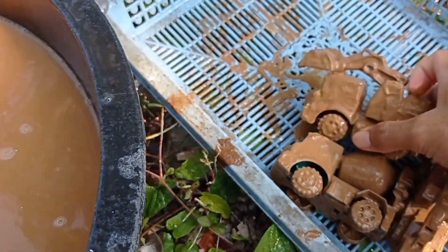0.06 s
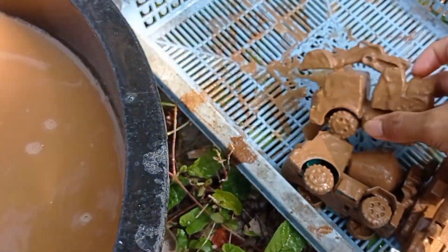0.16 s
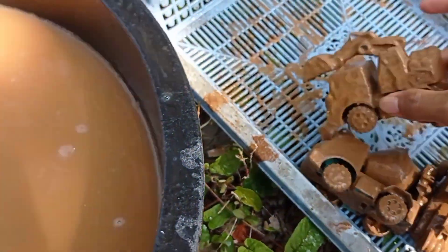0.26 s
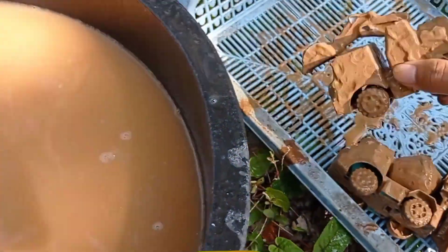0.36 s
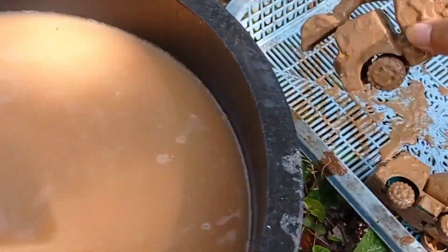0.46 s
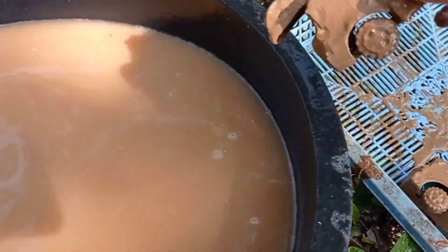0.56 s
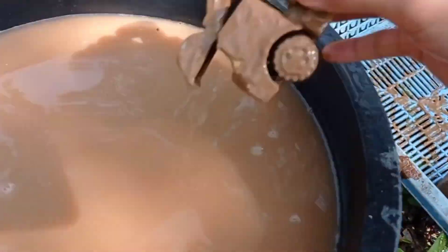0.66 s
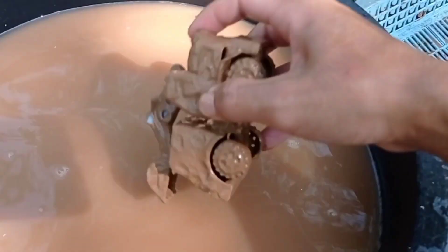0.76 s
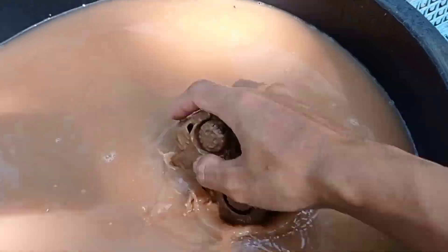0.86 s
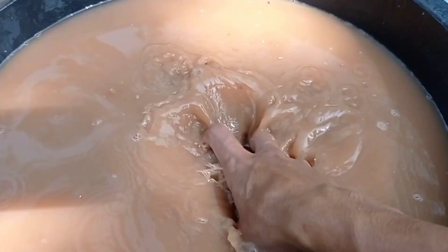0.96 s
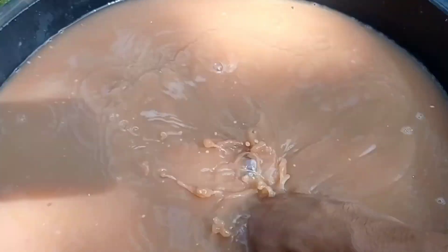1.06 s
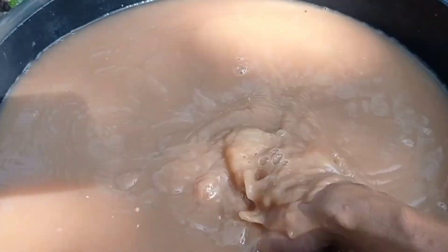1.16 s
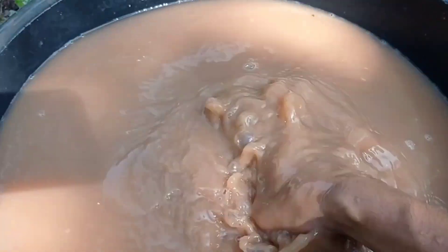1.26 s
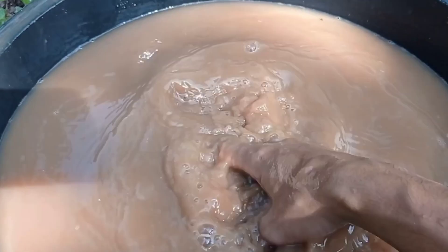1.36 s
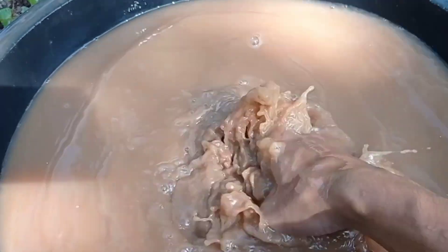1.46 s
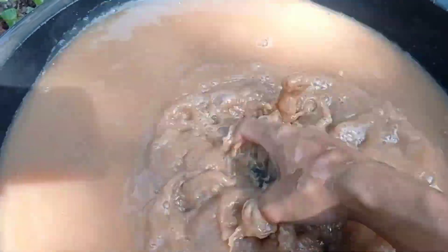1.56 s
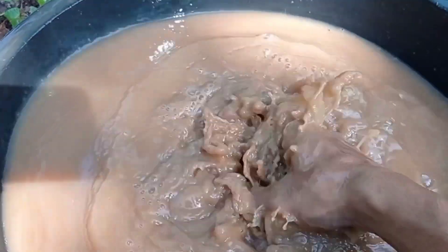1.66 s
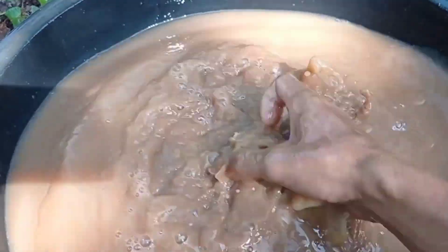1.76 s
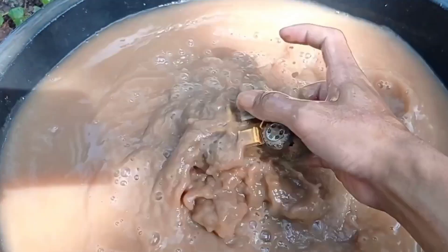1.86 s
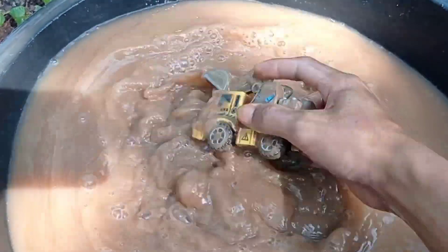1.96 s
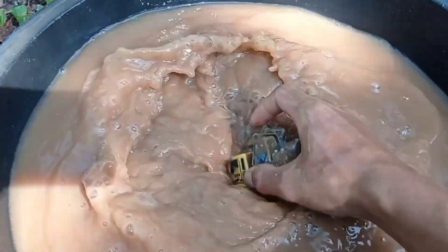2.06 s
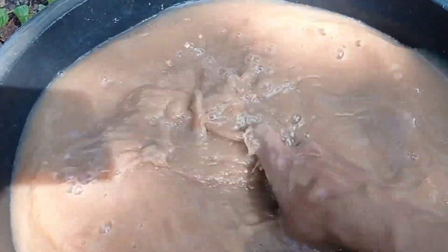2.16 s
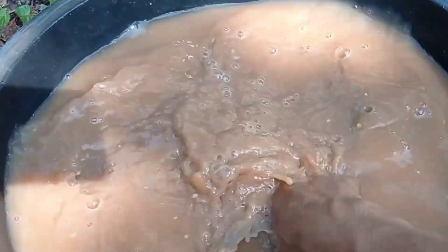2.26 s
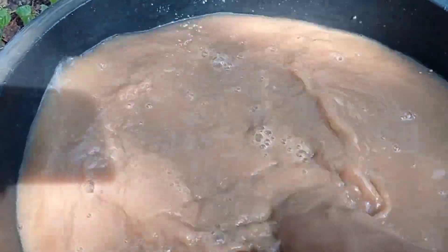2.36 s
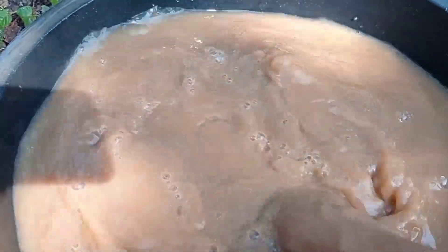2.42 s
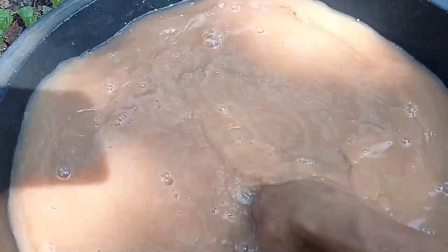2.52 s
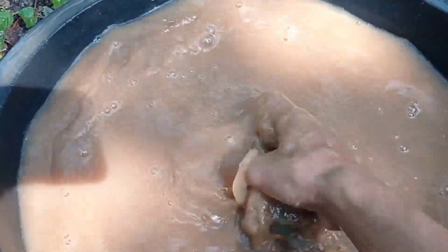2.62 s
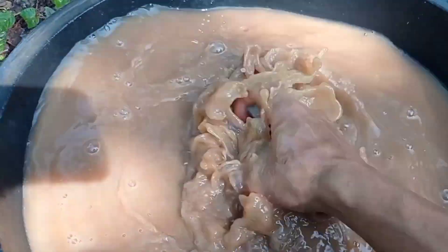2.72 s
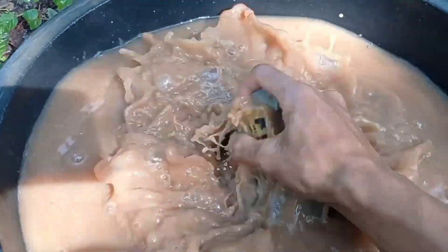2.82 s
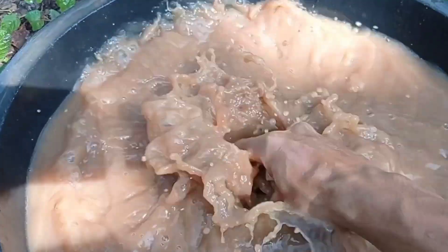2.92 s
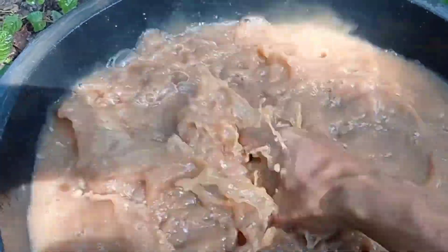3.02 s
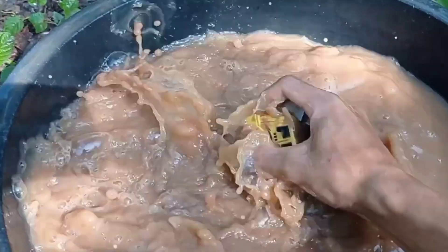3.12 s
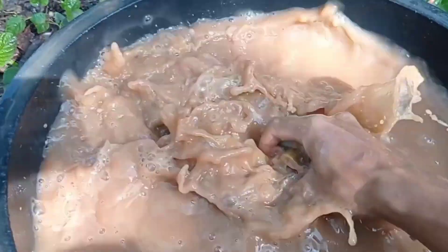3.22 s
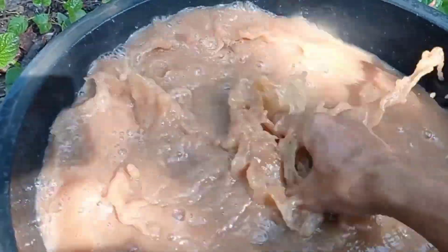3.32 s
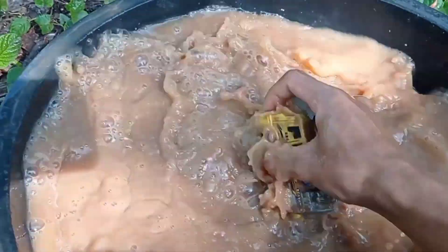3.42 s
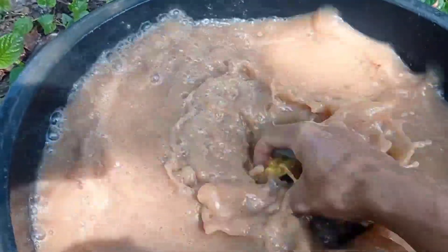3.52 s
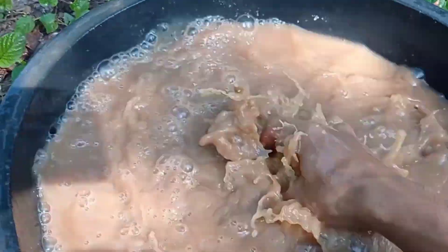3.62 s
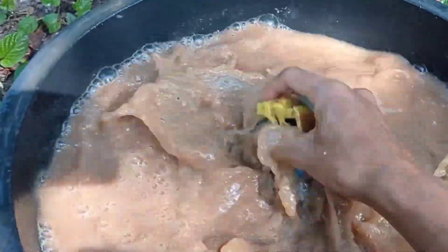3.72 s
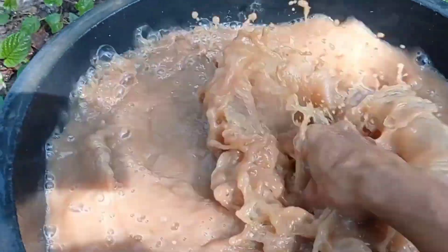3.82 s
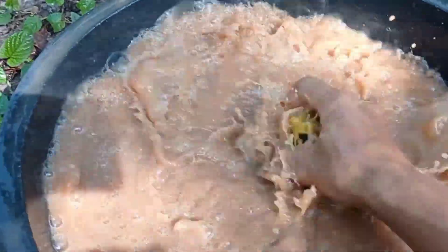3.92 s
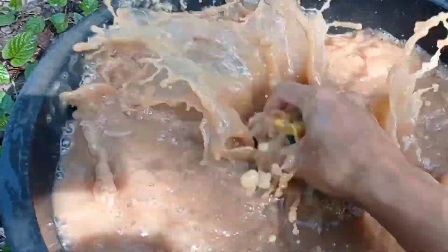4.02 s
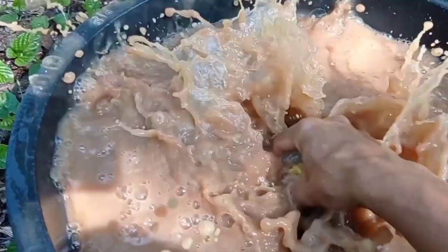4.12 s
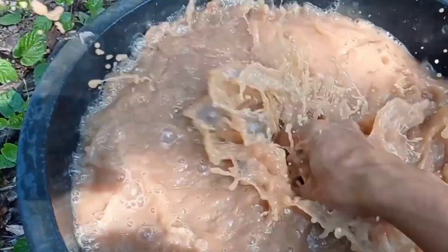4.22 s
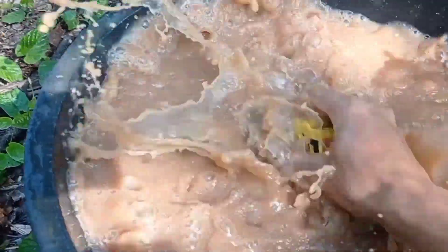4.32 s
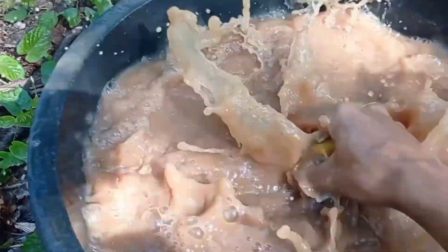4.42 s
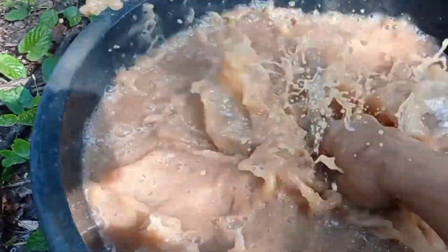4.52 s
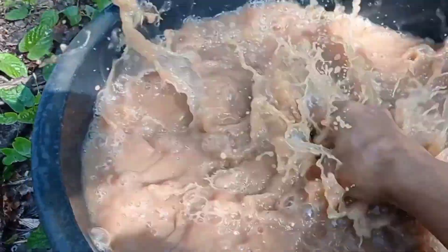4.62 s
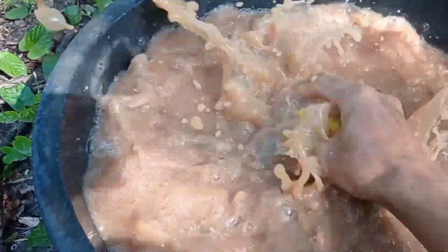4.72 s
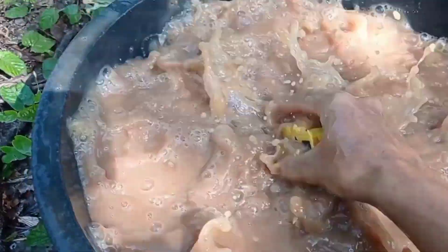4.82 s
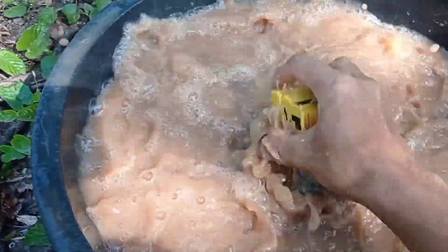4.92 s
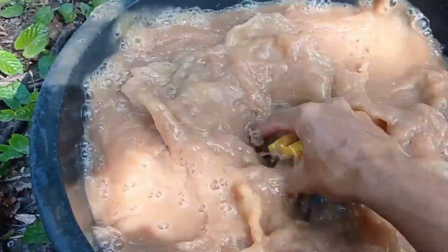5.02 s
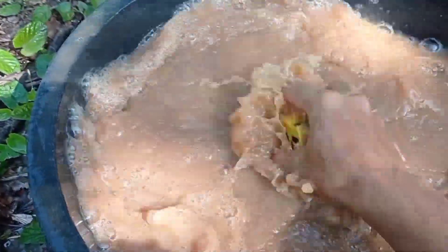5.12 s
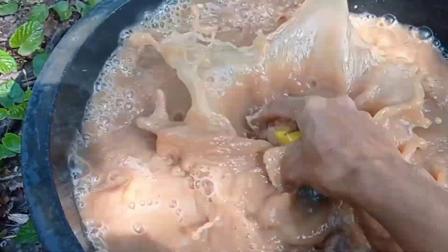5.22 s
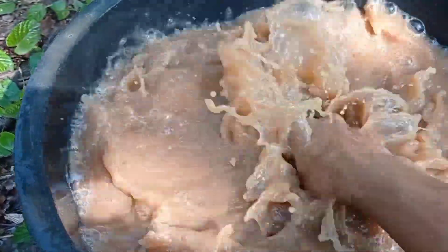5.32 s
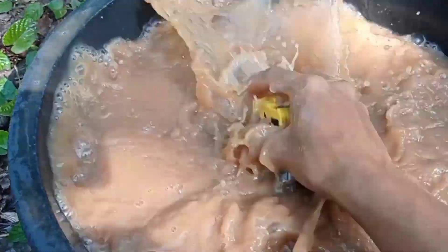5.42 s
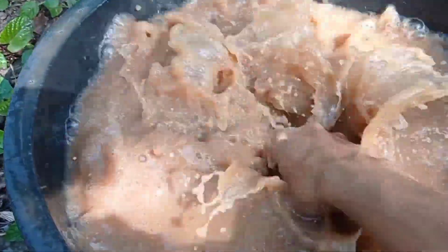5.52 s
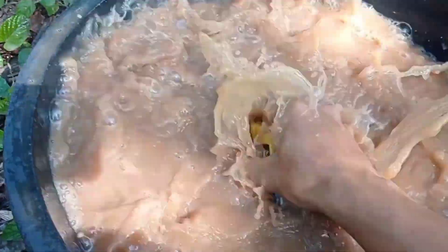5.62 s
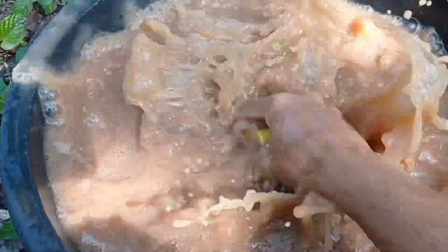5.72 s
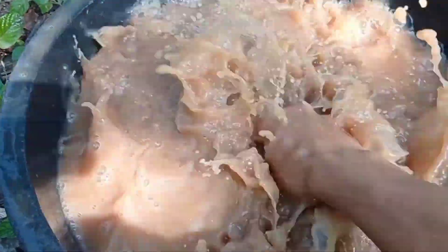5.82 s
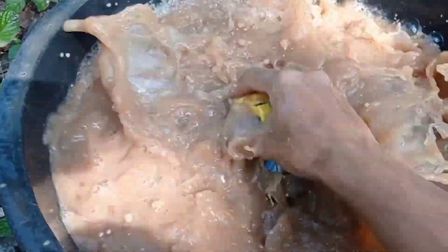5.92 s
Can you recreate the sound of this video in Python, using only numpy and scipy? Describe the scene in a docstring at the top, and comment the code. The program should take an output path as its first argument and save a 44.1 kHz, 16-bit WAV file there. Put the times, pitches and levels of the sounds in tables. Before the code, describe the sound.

The scene is a garden, with a close tub of muddy water over faint air, a thin steady insect shrill and a distant idling engine. From about 0.3 seconds a hand lifts a wet plastic toy, with drips, sharp little plastic ticks and plops. A dull bump of the tub and a brief high bird whistle come near 0.8 seconds. From 1 to 1.9 seconds the toy is dunked in a few separate splashes with bubbles and slaps. In a short lull around 2 seconds the small bird whistles faintly. From 2.3 seconds the toy is swished hard to and fro, six or seven strokes a second, a loud churning of spray, gulps, bubbles and slaps, while the engine fades. The strokes ease briefly near 4.5 seconds, then continue. Around 5.7 seconds the swishing stops, the last drops fall and the engine hum returns.

```python
"""Outdoors: a far engine idles under a steady insect shrill and faint garden air.
A hand lifts a wet plastic toy off a crate and dunks it in a tub of muddy water: drips, plastic ticks,
plopping air pockets, slaps and a dull bump, each briefly answered by the tub wall. A small bird whistles.
From 2.3 s the toy is swished hard to and fro; each stroke throws spray and folds in gulps and bubbles.
Near 5.7 s the swishing stops, the last drops fall and the engine, which had faded, comes back up."""
import sys
import numpy as np
from scipy import signal
from scipy.fft import rfft, irfft
from scipy.io import wavfile

SR = 44100
rng = np.random.default_rng(int(sys.argv[2]) if len(sys.argv) > 2 else 0)


def output_pcm(signal):
    """Save a mono or channel-first signal as 16-bit PCM at the path in sys.argv[1].

    Samples are clipped to [-1, 1] before scaling.
    """
    pcm = np.clip(np.atleast_2d(signal).T, -1, 1) * 32767
    wavfile.write(sys.argv[1], SR, np.round(pcm).astype(np.int16))


N = 263493
TIME = np.arange(N) / SR


def undb(db):
    """Decibels to gain."""
    return 10 ** (np.asarray(db) / 20)


def unit(x):
    """Scale to rms 1."""
    return x / np.sqrt(np.mean(x ** 2))


def curves(table):
    """The columns of a timed table as automation curves, one value a sample."""
    s, *columns = np.transpose(table)
    return [np.interp(TIME, s, c) for c in columns]


def clumps(rate_hz):
    """Random levels, smoothly joined; rms 1."""
    return unit(np.interp(TIME * rate_hz, np.arange(N), rng.standard_normal(N)))


def eq(x, points):
    """Filter by a curve of (freq_hz, gain_db) points."""
    hz, db = np.transpose(points)
    f = np.maximum(np.fft.rfftfreq(2 * N, 1 / SR), 1)
    return irfft(rfft(x, 2 * N) * undb(np.interp(np.log(f), np.log(hz), db)))[:N]


def bandpass(x, band_hz, order=3):
    """Keep what lies between two frequencies."""
    return signal.sosfilt(signal.butter(order, band_hz, "bandpass", fs=SR, output="sos"), x)


def resonate(x, hz, width_hz):
    """One steady resonance, gain 1 at its centre."""
    return signal.lfilter(*signal.iirpeak(hz, hz / width_hz, fs=SR), x)


def add(out, s, sound):
    """Mix a short sound in at time s."""
    i = int(np.clip(s * SR, 0, N))
    out[i:i + len(sound)] += sound[:N - i]


def ring(hz, swell_s, glide=0, phase=0, taper=2):
    """A tone swells and dies like a ringing air pocket, whose pitch slides as it changes shape."""
    age = np.arange(int(6 * swell_s * SR) + 2) / (swell_s * SR)
    pitch = hz * 2 ** (glide * np.tanh((age - 1.3) / 2))
    envelope = (age * np.exp(1 - age)) ** taper
    return envelope * np.sin(2 * np.pi * (np.cumsum(pitch) / SR + phase))


# idle speed: time_s, firings_per_s
ENGINE_SPEED = [(0, 32), (.35, 31.5), (1.05, 31.7), (2, 32.5), (3, 32.5), (5.97, 31.3)]
# engine fader: time_s, level_db
ENGINE_LEVEL = [(0, -52.5), (.7, -51), (2.3, -56), (3.6, -67.5), (5.78, -65), (5.88, -48.5), (5.97, -52)]
# boom of the exhaust: time_s, pitch_hz
EXHAUST_PITCH = [(0, 188), (1.4, 178.6), (2.3, 162.3), (3.2, 155), (5.6, 142.4), (5.97, 124)]


def engine(gain_db, swell_s, scatter_db, jitter_s, pitch_scatter):
    """Each firing gives one soft boom, and together they hum; distance has taken all the treble."""
    rate, db = curves(ENGINE_SPEED)[0], curves(ENGINE_LEVEL)[0]
    fired = np.floor(np.cumsum(rate) / SR)
    firings_s = np.flatnonzero(np.diff(fired, prepend=-1)) / SR
    out = np.zeros(N)
    for s, (late, strong, sharp) in zip(firings_s, rng.standard_normal((len(firings_s), 3))):
        hz = np.interp(s, *np.transpose(EXHAUST_PITCH)) * (1 + pitch_scatter * sharp)
        boom = undb(scatter_db * strong) * ring(hz, swell_s, taper=4.2)
        add(out, s - swell_s / 2 + jitter_s * late, boom)
    return unit(bandpass(out, [75, 300], order=2)) * undb(db + gain_db)


# far insect faders: time_s, shrill_db, chorus_db
INSECT_LEVELS = [(0, -52, -51), (.25, -51, -73), (.45, -53.5, -59), (1.9, -52.5, -64), (2.05, -52.5, -61),
                 (2.4, -54.5, -67), (5.97, -66.5, -60.5)]


def insects(shrill_hz, width_hz, chorus_hz, chorus_width_hz):
    """One narrow, wavering shrill and a broader chorus above it."""
    near, far = rng.standard_normal((2, N))
    shrill_db, chorus_db = curves(INSECT_LEVELS)
    shrill = resonate(resonate(near, shrill_hz, width_hz), shrill_hz, width_hz)
    chorus = resonate(resonate(far, chorus_hz, chorus_width_hz), chorus_hz, chorus_width_hz)
    return undb(shrill_db) * unit(shrill) + undb(chorus_db) * unit(chorus)


# tone of the garden air: freq_hz, gain_db
AIR_EQ = [(25, -5.5), (60, -6.5), (110, 9.5), (300, -4), (450, -17), (1100, -14.5), (3000, -20.5),
          (3600, -8.5), (4400, -22.5), (5200, -4), (5650, -17), (7000, -12), (10000, -26.5)]
# air fader: time_s, level_db
AIR_FADER = [(0, -52), (1.8, -61.5), (2.15, -55.5), (5.97, -66)]


def breeze(waver_db, waver_hz):
    """A faint bed of garden air; each band wavers on its own."""
    edges = np.geomspace(25, 12000, 20)
    noise = rng.standard_normal(N)
    air = sum(bandpass(noise, band) * undb(waver_db * clumps(waver_hz)) for band in zip(edges, edges[1:]))
    return undb(curves(AIR_FADER)[0]) * unit(eq(air, AIR_EQ))


def surge(s, rise_s, fall_s):
    """Power of one surge of water: it builds up to its peak at s and dies away."""
    out, t = np.zeros(N), TIME[:SR // 3] - 1 / 6
    add(out, s + t[0], np.exp(-(t / np.where(t < 0, rise_s, fall_s)) ** 2))
    return out


# lifting, dunking, letting go: peak_s, half_length_s, level_db, brightness_db
HAND_MOVES = [(.045, 0.0072, -69, -7), (0.284, 0.023, -60.5, -8), (0.358, 0.015, -50, -2),
              (0.425, 0.0083, -33.5, 1.5), (0.452, 0.0032, -28.5, 4), (0.471, 0.014, -34.5, 5),
              (0.525, 0.019, -40, 0.5), (0.592, 0.027, -38, 9.5), (0.651, 0.012, -38, -14),
              (0.699, 0.0027, -50, 14), (.7, 0.033, -55, -17.5), (0.758, 0.023, -47, -17),
              (0.873, 0.011, -36, -1), (0.97, 0.17, -49, -3.5), (1.059, 0.029, -43, 14),
              (1.073, 0.031, -37.5, -10), (1.193, 0.053, -35, 0), (1.247, 0.021, -29, -2),
              (1.285, 0.03, -35.5, 0.5), (1.375, 0.031, -47, -13), (1.449, 0.0055, -39.5, 4.5),
              (1.543, 0.083, -45, 5.5), (1.695, 0.017, -36, 1), (1.742, 0.008, -34, 1.5),
              (1.774, 0.01, -37, 8.5), (1.835, 0.013, -42, -16), (1.96, 0.1, -70.5, -28.5),
              (2.027, 0.032, -57.5, -27), (2.256, 0.021, -44, -0.5), (4.46, 0.048, -63, 4),
              (4.691, 0.006, -48, -15), (5.523, 0.0099, -32.5, -1.5), (5.73, 0.029, -38.5, 5),
              (5.847, 0.0092, -53, -15.5), (5.933, 0.015, -45.5, 7)]


def handling(gulp_db, spray_db):
    """Power of gulps, bubbles and spray in single moves of the toy; brightness trades gulps for spray."""
    power = np.zeros((3, N))
    for s, half_s, db, bright_db in HAND_MOVES:
        mix = undb([db + gulp_db - bright_db, db, db + spray_db + bright_db])
        power += mix[:, None] ** 2 * surge(s, half_s, half_s)
    return power


def swarm(low_hz, high_hz, cycles, spread_db, rise, count):
    """Many bubbles of scattered size and damping; most rise in pitch as they near the surface."""
    out = np.zeros(N)
    for k, (when, pitch, strength, damping, slide, phase) in enumerate(rng.random((count, 6))):
        hz = low_hz * (high_hz / low_hz) ** pitch
        life = 4 ** (2 * damping - 1)  # short lives are sharp ticks, long ones soft blips
        gain = undb(-spread_db * np.sqrt(strength)) * np.sqrt(hz / high_hz) * life ** -.3
        bubble = ring(hz, life * cycles / hz, rise * (2 * slide - .5), phase)
        add(out, (k + when) * N / SR / count, gain * bubble)
    return out


# tone of the gulps: freq_hz, gain_db
GULP_EQ = [(60, -32.5), (130, -24), (210, -4.5), (330, -7.5), (550, 6.5), (850, 6), (1200, 12), (2500, -28)]


def gulps():
    """Big pockets of folded-in air, low and quickly damped by the mud."""
    return eq(swarm(171, 1022, cycles=1.3, spread_db=15, rise=0.12, count=2200), GULP_EQ)


# tone of the bubbles: freq_hz, gain_db
BUBBLE_EQ = [(300, -33.5), (650, -29), (950, -3), (1700, 6.5), (2400, 5), (3200, 1.5), (4500, 7.5),
             (9000, -21.5)]


def bubbles(blip_db):
    """Mud damps most mid-sized bubbles within a few cycles; a few ring on as short blips."""
    damped = swarm(806, 3538, cycles=2.4, spread_db=15, rise=0.085, count=5000)
    blips = swarm(850, 3600, cycles=4.2, spread_db=13, rise=0.1, count=700)
    return eq(unit(damped) + undb(blip_db) * unit(blips), BUBBLE_EQ)


# tone of the spray: freq_hz, gain_db
SPRAY_EQ = [(1200, -32), (2500, -3), (3400, 4), (4500, 4.5), (6200, -0.5), (8300, 4.5), (9300, 1.5),
            (10300, -27)]


def spray(droplet_db):
    """A fine, bright mist with a few falling droplets standing out of it."""
    mist = swarm(2890, 10680, cycles=10.8, spread_db=5.5, rise=0.0067, count=14000)
    droplets = swarm(2700, 9500, cycles=7, spread_db=14, rise=0.04, count=550)
    return eq(unit(mist) + undb(droplet_db) * unit(droplets), SPRAY_EQ)


def tearing(steady_db, tears_per_s=150, decay_s=0.002, spread_db=2):
    """Sheets of water tear at random: a gain of short bursts over a steady part."""
    bursts = (rng.random(N) < tears_per_s / SR) * undb(spread_db * rng.standard_normal(N)) ** 2
    power = signal.lfilter([1], [1, -np.exp(-1 / (decay_s * SR))], bursts)
    return unit(np.sqrt(power / power.mean() + undb(steady_db) ** 2))


def water(gulp_db, bubble_db, spray_db, clump_db, fizz_db, plip_db):
    """Gulps, bubbles and spray, shed in clumps: gentle moves make them fizz, hard strokes churn."""
    layers = (gulps(), gulp_db), (bubbles(blip_db=-3), bubble_db), (spray(droplet_db=-4), spray_db)
    textures = np.array([undb(db) * unit(x * undb(clump_db * clumps(90))) for x, db in layers])
    hard = np.sqrt(swishing(wake_s=0.11))
    gentle = np.sqrt(handling(gulp_db=-11.5, spray_db=-6.5))
    churn = np.sum(hard * textures, axis=0) * tearing(steady_db=6.5)
    fizz = np.sum(gentle * textures, axis=0) * tearing(steady_db=-1.5)
    # a gentle move sheds few bubbles, so single plips stand out
    plips = gentle[1] * unit(swarm(1200, 4800, cycles=3, spread_db=12, rise=0.1, count=800))
    return churn + undb(fizz_db) * fizz + undb(plip_db) * plips


def tub(x, t60_s):
    """Short reflections between wall and moving water: never twice alike, so each band trails noise."""
    edges = np.geomspace(150, 12000, 14)
    keep = np.exp(-2 * np.log(1000) / (t60_s * SR))
    out = np.zeros(N)
    for band in zip(edges, edges[1:]):
        energy = signal.lfilter([1 - keep], [1, -keep], bandpass(x, band) ** 2)
        out += np.sqrt(energy) * unit(bandpass(rng.standard_normal(N), band))
    return out


# drips falling back on the water: start_s, pitch_hz, level_db
FALLING_DROPS = [(0.351, 2000, -27), (1.178, 2430, -17.5), (1.2822, 2780, -19), (1.319, 1590, -24.5),
                 (1.368, 1580, -26.5), (1.447, 1990, -36), (1.505, 1900, -45), (1.6522, 1620, -30.5),
                 (1.676, 3570, -31), (2.03, 970, -27), (2.26, 2600, -31), (2.512, 3660, -14),
                 (2.705, 3220, -17), (3.163, 3550, -16), (3.2974, 3820, -22), (3.311, 2130, -20),
                 (3.3285, 2000, -20), (3.3515, 2720, -20), (3.4844, 2175, -19), (3.504, 1580, -21),
                 (3.553, 2320, -16), (4.356, 1710, -18), (4.661, 2370, -22), (4.699, 1270, -23.5),
                 (4.8385, 1790, -21), (4.959, 1610, -14), (5.169, 4490, -17), (5.576, 1880, -19),
                 (5.652, 1230, -18.5), (5.679, 3350, -16), (5.747, 3130, -34), (5.776, 3270, -23),
                 (5.833, 4770, -22), (5.847, 2580, -30), (5.9177, 4000, -23)]


def drops(gain_db, decay_cycles, rise_oct_per_s, click_db, click_s):
    """A drop lands with a click and traps a tiny bubble that rings and rises in pitch."""
    out, age = np.zeros(N), TIME[:SR // 40]
    for s, hz, db in FALLING_DROPS:
        cycles = np.cumsum(hz * 2 ** (rise_oct_per_s * age)) / SR
        bubble = (1 - np.exp(-cycles)) * np.exp(-cycles / decay_cycles) * np.sin(2 * np.pi * cycles)
        click = undb(click_db) * rng.standard_normal(len(age)) * np.exp(-age / click_s)
        add(out, s, undb(db + gain_db) * (bubble + click))
    return out


# ticks of the plastic toy: start_s, level_db
TOY_TICKS = [(0.415, -29), (0.5535, -12), (0.643, -19), (1.593, -19.5), (1.78, -17), (1.833, -24),
             (1.886, -30.5), (5.887, -26.5)]
# tone of a tick: freq_hz, gain_db
TICK_EQ = [(300, -16), (1200, -26), (2600, 5), (4000, 7.5), (5800, 2.5), (7800, 2), (10000, -6)]


def ticks(gain_db, attack_s, decay_s):
    """Hard little impacts on plastic: a bright crack that is gone in a few milliseconds."""
    envelope, age = np.zeros(N), TIME[:SR // 40]
    shape = np.minimum(age / attack_s, np.exp((attack_s - age) / decay_s))
    for s, db in TOY_TICKS:
        add(envelope, s, undb(db + gain_db) * shape)
    return envelope * unit(eq(rng.standard_normal(N), TICK_EQ))


# the loudest single air pockets: start_s, pitch_hz, level_db, swell_s, glide_oct
AIR_POCKETS = [(0.4177, 1810, -16.5, 0.0044, -.43), (0.419, 593, -19, 0.0042, -0.012),
               (.451, 1600, -17, 0.0045, 0.28), (0.4725, 1250, 2.5, .0022, .2),
               (0.4997, 1150, -20.5, 0.0075, 0.44), (0.5654, 640, -18.5, 0.0017, -0.73),
               (0.587, 364, -5.5, 0.0023, -0.56), (.617, 965, -12, 0.0025, 0.2),
               (0.621, 343, -15, 0.0032, -0.096), (.756, 760, -16, 0.0038, -0.16),
               (0.7612, 366, -12, 0.0022, 0.79), (0.761, 1200, -22, 0.0088, -0.068),
               (0.7716, 536, -21, 0.0074, -.27), (0.7878, 1050, -5, 0.0023, -0.12),
               (.802, 1460, -27, 0.0096, -.18), (0.8883, 525, -7.5, 0.0033, 0.49),
               (1.0603, 1940, -19, .004, -.2), (1.147, 1095, -22.5, .005, 0.32),
               (1.244, 1110, -26, 0.0034, 0.41), (1.245, 633, -25, 0.0062, 0.021),
               (1.59, 1454, -19.5, 0.0066, .14), (1.6853, 2250, -17.5, .003, -0.0038),
               (1.825, 1000, -15, 0.0028, -0.83), (1.8286, 496, -18, 0.0036, 0.0092),
               (2.0518, 667, -22.5, 0.0074, -0.17), (2.2348, 1870, -24, .0026, -0.06),
               (2.2874, 1820, -21.5, 0.0062, 0.076), (2.372, 1056, -13, 0.0061, -0.36),
               (2.3772, 1720, -4.5, 0.0013, -0.72), (2.39, 1050, -10, .003, -0.11),
               (2.4597, 1590, -12, 0.0035, 0), (2.5268, 2130, -11.5, 0.0012, 0.053),
               (2.586, 1520, -15, 0.0042, -0.072), (2.7492, 2120, -7.5, 0.0039, .2),
               (2.8176, 1110, -5, 0.00094, 0.5), (2.816, 1745, -6, 0.005, 0.32),
               (2.825, 700, -14.5, .003, -0.24), (2.8494, 2550, -14, 0.0038, -0.03),
               (2.947, 766, -15, 0.0022, 0.17), (2.96, 578, -16.5, 0.0045, 0.087),
               (2.9723, 600, -12, 0.0037, -0.37), (3.123, 1600, -27, 0.0036, 0.11),
               (3.145, 670, -12.5, 0.0023, -0.18), (3.265, 1920, -9, 0.0014, 0.03),
               (3.2717, 1530, -10, 0.0034, -0.048), (3.272, 650, -28, 0.002, -0.09),
               (3.389, 1590, -15, 0.0034, 0.15), (3.4268, 2060, -9, 0.0027, 0.45),
               (3.4322, 620, -11, 0.0041, .37), (3.4622, 960, -5, 0.0011, -.35),
               (3.718, 738, -14.5, 0.0046, 0.7), (3.871, 1510, -14.5, 0.0019, 0),
               (3.92, 763, -18.5, 0.0034, 0.31), (3.9324, 800, -15, 0.0018, -0.14),
               (4.1965, 775, -14.5, 0.0025, 0.19), (4.279, 1850, -7, 0.0013, 0.31),
               (4.394, 422, -16.5, 0.0019, -0.017), (4.607, 1550, -15, 0.0039, -0.14),
               (4.792, 1240, -14.5, 0.0041, 0.045), (5.1271, 795, -15.5, 0.0033, 0.6),
               (5.1363, 1684, -14.5, 0.0069, -0.04), (5.2277, 2104, -10, 0.0033, 0.74),
               (5.2875, 890, -9.5, 0.0042, 0.14), (5.291, 922, -12, 0.0071, -0.14),
               (5.322, 2020, -18, 0.0023, -0.05), (5.3978, 1970, -5.5, 0.0024, 0.13)]


def plops(gain_db, mud_taper, thud_ratio, thud_db, thud_full_hz):
    """A pocket rings over a lower thud of the water it shoves aside; more taper stops it sooner."""
    out = np.zeros(N)
    for s, hz, db, swell_s, glide in AIR_POCKETS:
        pocket = ring(hz, swell_s, glide, rng.random(), mud_taper)
        thud = ring(hz * thud_ratio, swell_s, glide, rng.random(), mud_taper)
        thud_gain = undb(thud_db) * min(hz / thud_full_hz, 1)  # weaker under low-pitched pockets
        add(out, s, undb(db + gain_db) * (pocket + thud_gain * thud))
    return out


# water hitting hand, toy and wall: start_s, centre_hz, level_db, decay_s
WATER_SLAPS = [(0.5538, 2470, -16, 0.0025), (.589, 1000, -22, 0.0016), (.645, 3200, -18.5, 0.0024),
               (1.06, 3200, -22, 0.0033), (1.097, 2770, -22.5, 0.0033), (1.147, 2260, -18.5, 0.0033),
               (1.241, 2510, -18.5, 0.0069), (1.767, 3150, -18.5, 0.013), (2.324, 2200, -19, 0.018),
               (2.342, 2440, -20, 0.0031), (2.398, 2420, -14, 0.0042), (2.463, 2200, -13.5, 0.0064),
               (2.5256, 1810, -12, 0.0028), (2.818, 1100, -28, 0.0067), (2.933, 1060, -15, 0.0023),
               (2.991, 3420, -17, 0.0022), (3.049, 3460, -18, 0.0027), (3.071, 2400, -20.5, 0.0052),
               (3.124, 3080, -12.5, 0.0048), (3.146, 2230, -15, 0.0022), (3.229, 2400, -19, 0.003),
               (3.368, 3000, -24, .004), (3.438, 1700, -9, 0.0052), (3.4626, 1730, -22, 0.0014),
               (3.531, 3740, -12.5, 0.0059), (3.541, 3220, -17, .004), (3.59, 1070, -18, 0.004),
               (3.66, 2500, -18.5, 0.0079), (3.686, 3000, -11.5, 0.0019), (3.7112, 2800, -16.5, 0.0017),
               (3.796, 2980, -17.5, 0.006), (3.814, 2100, -31, .005), (3.8605, 2750, -31, 0.002),
               (3.914, 2700, -18.5, 0.0014), (3.9645, 2330, -20, 0.002), (4.057, 2550, -15, 0.0019),
               (4.087, 3670, -16, 0.004), (4.131, 2010, -19, 0.0045), (4.1943, 3430, -13, 0.0051),
               (4.2209, 3020, -7, 0.0027), (4.407, 4430, -20, 0.005), (4.558, 3330, -22, 0.0023),
               (4.622, 2650, -18.5, 0.0034), (4.73, 2340, -17, 0.0091), (4.794, 1500, -30, 0.002),
               (4.82, 2050, -15.5, 0.0061), (4.892, 2660, -18.5, 0.0075), (5.064, 3100, -15, 0.0041),
               (5.2136, 2650, -15.5, 0.0069), (5.234, 3160, -13, 0.008), (5.146, 3530, -18, 0.0047),
               (5.29, 1300, -13.5, 0.0018), (5.4, 2830, -13.5, 0.0069), (5.469, 2300, -13, 0.002),
               (5.533, 6450, -19.5, 0.0033), (5.589, 2800, -12, 0.0031)]


def slaps(gain_db, attack_s, width_oct):
    """Water smacks a surface: a sudden broad crack, lower the larger the patch that lands."""
    out, age = np.zeros(N), TIME[:2048]
    hz = np.maximum(np.fft.rfftfreq(len(age), 1 / SR), 1)
    for s, centre_hz, db, decay_s in WATER_SLAPS:
        shape = np.minimum(age / attack_s, np.exp((attack_s - age) / decay_s))
        band = 1 / (1 + (np.log2(hz / centre_hz) / width_oct) ** 2)
        crack = shape * irfft(rfft(rng.standard_normal(len(age))) * band)
        add(out, s, undb(db + gain_db) * crack * np.linalg.norm(shape) / np.linalg.norm(crack))
    return out


# dull low thumps of the hand in the water: start_s, level_db
HAND_THUMPS = [(0.756, -32), (3.1215, -38), (5.2265, -30)]


def bumps(pitch_hz, swell_s):
    """Now and then the hand gives a dull, low thump."""
    out = np.zeros(N)
    for s, db in HAND_THUMPS:
        add(out, s, undb(db) * ring(pitch_hz, swell_s))
    return out


# bird notes: start_s, length_s, start_hz, end_hz, level_db, echo_db, waver_ratio
BIRD_NOTES = [(0.803, 0.077, 9900, 6300, -40.5, -6, 0.0074), (1.836, 0.055, 3940, 4500, -55, -1, .015),
              (1.874, 0.13, 4710, 4620, -61, -2, 0.015), (1.955, 0.1, 8460, 7000, -54.5, -7, 0.04),
              (2.065, 0.062, 4100, 3250, -57.5, 0, 0.025), (2.168, 0.077, 3620, 4450, -51.5, -2, 0.02),
              (2.194, 0.12, 7500, 6800, -63.5, 6, 0.033)]


def bird(t60_s, flutter_db):
    """Thin, unsteady whistles; the trees smear the far ones most."""
    direct, scattered = np.zeros((2, N))
    for s, length_s, start_hz, end_hz, db, echo_db, waver in BIRD_NOTES:
        progress = np.linspace(0, 1, int(length_s * SR))
        pitch = (start_hz + (end_hz - start_hz) * progress) * (1 + waver * clumps(620)[:len(progress)])
        flutter = flutter_db * clumps(137)[:len(progress)]
        swell = np.sqrt(2) * np.sin(np.pi * progress) * undb(db + flutter)
        note = swell * np.sin(2 * np.pi * np.cumsum(pitch) / SR)
        add(direct, s, note)
        add(scattered, s, undb(echo_db) * note)
    trees = rng.standard_normal(SR) * np.exp(-np.log(1000) * TIME[:SR] / t60_s)
    return direct + signal.fftconvolve(scattered, trees / np.linalg.norm(trees))[:N]


# strokes to and fro, 6 to 7 a second: push_s, pull_s, push_db, pull_db, extra_push_spray_db
STROKES = [(2.315, 2.389, -38.5, -27, 8.5), (2.464, 2.544, -25, -26, 1), (2.6, 2.676, -27.5, -29, 2.5),
           (2.753, 2.826, -30, -25, 2.5), (2.901, 2.978, -28, -25, -3), (3.05, 3.121, -28, -23, 2),
           (3.208, 3.276, -26, -22, 1), (3.377, 3.451, -22, -25, 3), (3.523, 3.594, -23.5, -26.5, 4.5),
           (3.658, 3.738, -24.5, -26.5, 1), (3.796, 3.867, -24, -25, 0.5), (3.933, 4.003, -23.5, -25.5, 1),
           (4.072, 4.144, -23.5, -26, 4), (4.204, 4.267, -23.5, -27, 2), (4.334, 4.396, -29, -37, -1),
           (4.54, 4.605, -30, -28, 5.5), (4.734, 4.798, -28, -27, 3), (4.89, 4.971, -26.5, -26.5, 2.5),
           (5.055, 5.141, -24, -27.5, 3.5), (5.218, 5.301, -27.5, -25, 3), (5.392, 5.464, -25.5, -26.5, 1),
           (5.58, 5.665, -25, -31, 2)]


def swishing(wake_s):
    """Power of the swishing: a push throws spray, the pull back folds in air, the wake fizzes on."""
    # each triple: gulps, bubbles, spray
    push_mix_db, pull_mix_db, wake_db = [-8.5, -1, -4.5], [-6.5, -2.5, -8], [-16.5, -19, -6.5]
    lags_s, rises_s, falls_s = [0.001, 0.0054, 0.02], [0.015, 0.019, 0.029], [0.024, 0.027, 0.0092]
    power = np.zeros((3, N))
    for push_s, pull_s, push_db, pull_db, throw_db in STROKES:
        push = undb(np.add(push_mix_db, push_db) + [0, 0, throw_db])
        pull = undb(np.add(pull_mix_db, pull_db))
        for k, (lag_s, rise_s, fall_s) in enumerate(zip(lags_s, rises_s, falls_s)):
            power[k] += push[k] ** 2 * surge(push_s + lag_s, rise_s, fall_s)
            power[k] += pull[k] ** 2 * surge(pull_s + lag_s, rise_s, fall_s)
    keep = np.exp(-1 / (wake_s * SR))
    wake = signal.lfilter([1 - keep], [1, -keep], power)
    return power + undb(wake_db)[:, None] ** 2 * wake


def scene():
    """The tub sits dead centre; only reflections and air differ between left and right."""
    pockets = plops(gain_db=-3.5, mud_taper=3.17, thud_ratio=0.517, thud_db=-17, thud_full_hz=1500)
    pockets += drops(gain_db=0.5, decay_cycles=6.4, rise_oct_per_s=5.6, click_db=-20, click_s=0.0004)
    pockets += bumps(pitch_hz=106, swell_s=0.0025)
    cracks = ticks(gain_db=-4, attack_s=0.00086, decay_s=0.0035)
    cracks += slaps(gain_db=-4, attack_s=0.00058, width_oct=0.48)
    swish = water(gulp_db=1, bubble_db=-0.73, spray_db=-0.95, clump_db=1.45, fizz_db=-0.5, plip_db=-4)
    # spray flies out to the wall, so it gets more of the tub than the plops in the middle
    tub_send = undb(-14) * pockets + undb(-8) * cracks + undb(-6.5) * swish
    splash = pockets + cracks + swish + tub(tub_send, t60_s=0.035)
    # small pockets radiate hardly any deep bass
    splash = signal.sosfilt(signal.butter(1, 120, "highpass", fs=SR, output="sos"), splash)
    garden = engine(gain_db=5.5, swell_s=0.012, scatter_db=1.8, jitter_s=0.0004, pitch_scatter=0.035)
    garden += bird(t60_s=0.79, flutter_db=6.5)
    garden += insects(shrill_hz=6094, width_hz=124, chorus_hz=7530, chorus_width_hz=1300)
    air, side_air = (breeze(waver_db=3.5, waver_hz=22.08) for _ in range(2))
    mid = splash + garden + air
    side = stereo_reflections(splash + undb(-3) * garden) + undb(-14) * side_air
    return np.array([mid + side, mid - side])


# stereo width of the reflections: freq_hz, side_db
WIDTH_EQ = [(120, -20), (500, -21), (1100, -17.3), (4000, -16), (9000, -16.3)]


def stereo_reflections(x):
    """The side signal: very short reflections that differ between left and right."""
    return eq(tub(x, t60_s=0.012), WIDTH_EQ)


def record(dry):
    """Clip just under full scale, then cut the top steeply at 10.1 kHz."""
    high_cut = signal.ellip(10, .2, 70, 10100, fs=SR, output="sos")
    return signal.sosfilt(high_cut, np.clip(dry, -.95, .95))


dry = scene()
out = record(dry)
output_pcm(out)
```